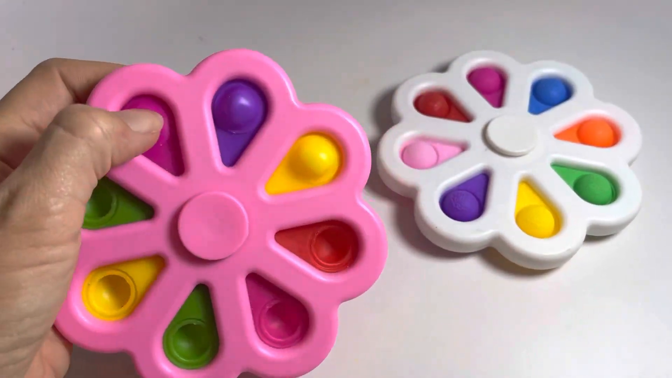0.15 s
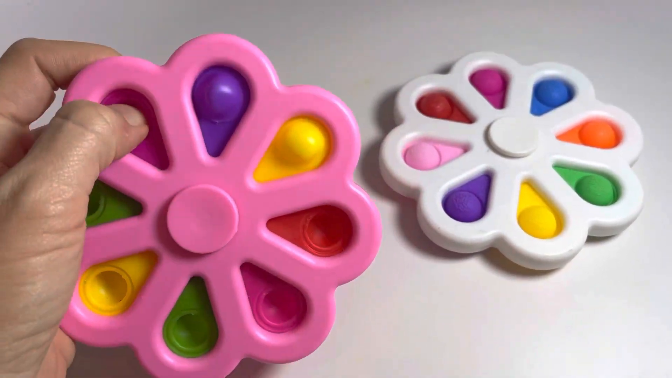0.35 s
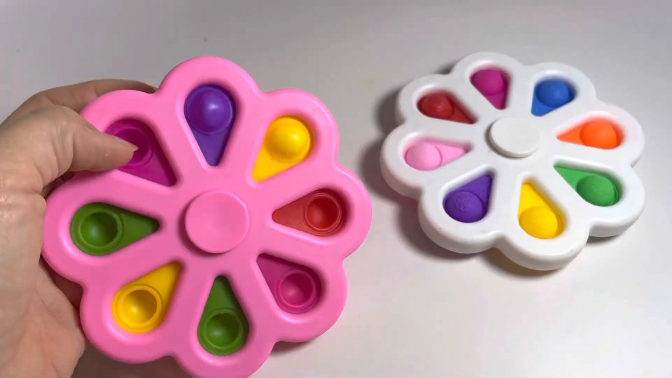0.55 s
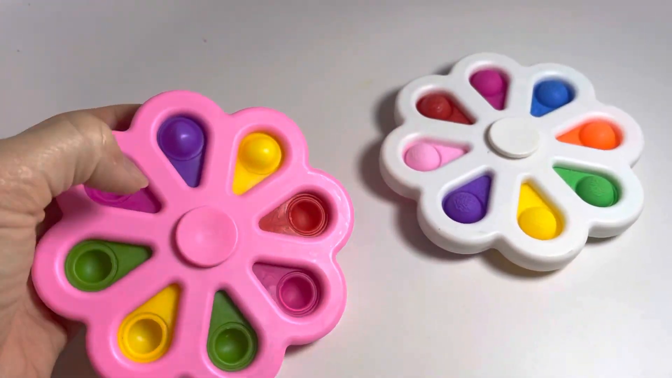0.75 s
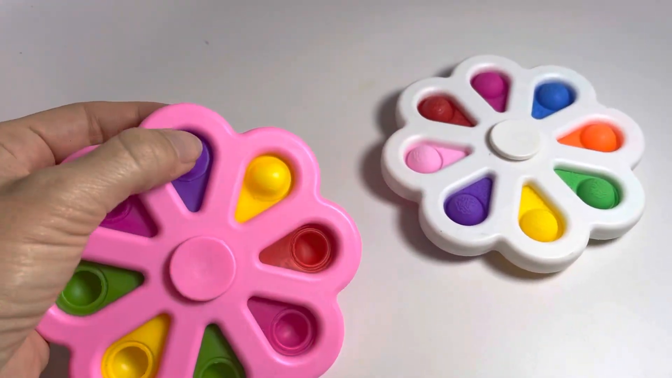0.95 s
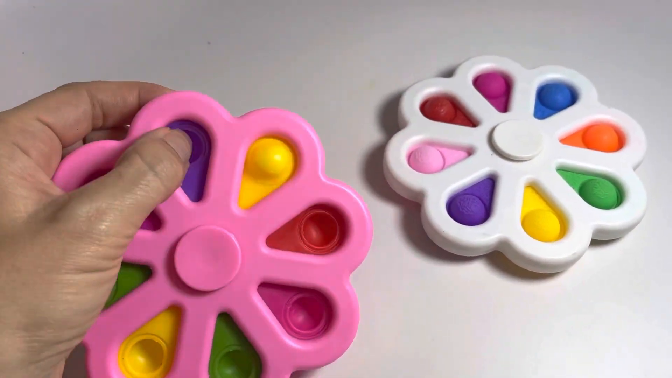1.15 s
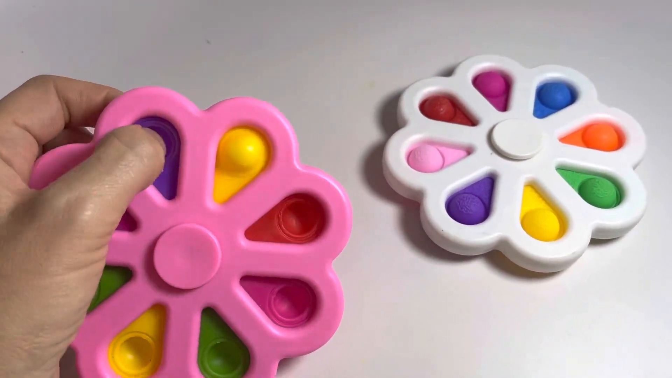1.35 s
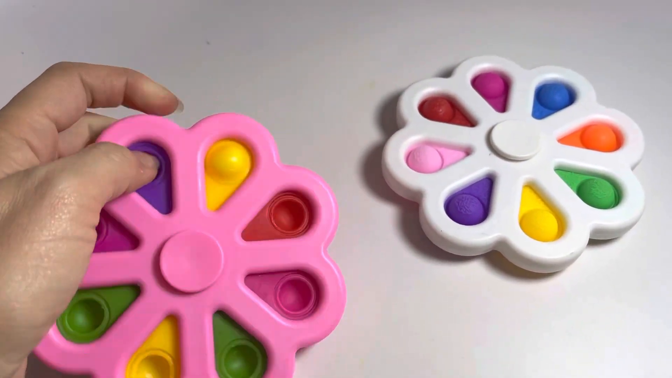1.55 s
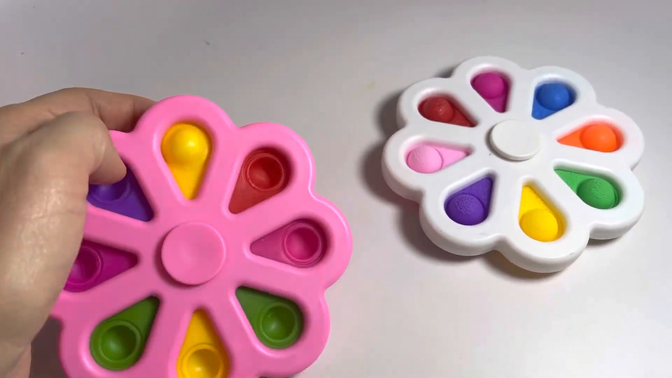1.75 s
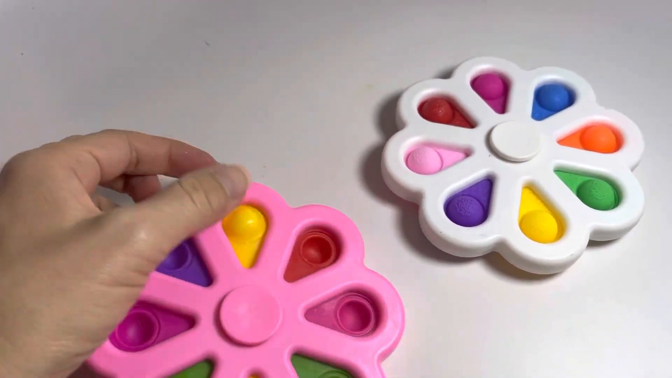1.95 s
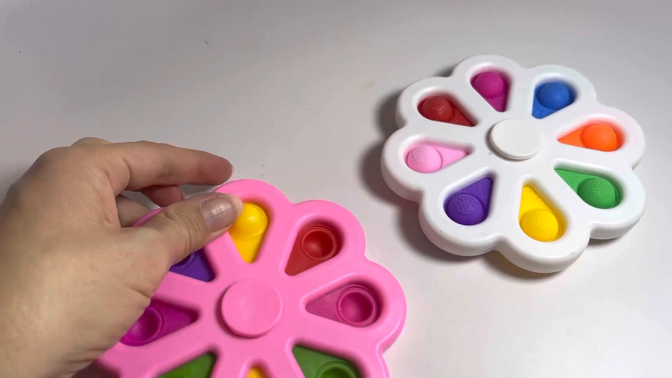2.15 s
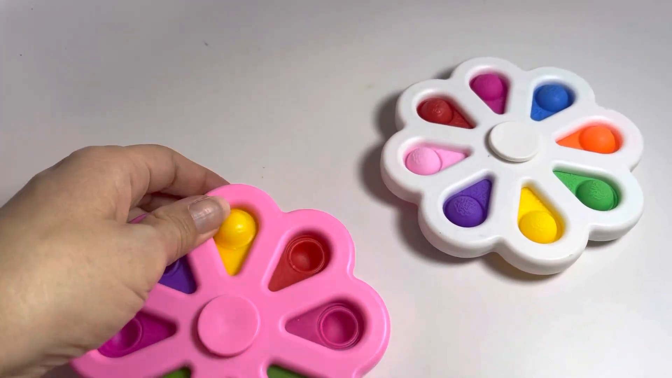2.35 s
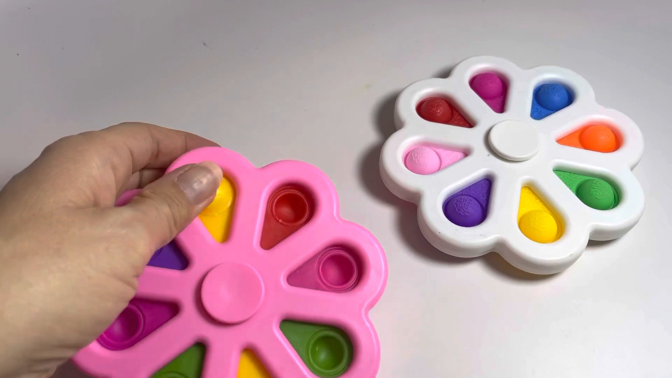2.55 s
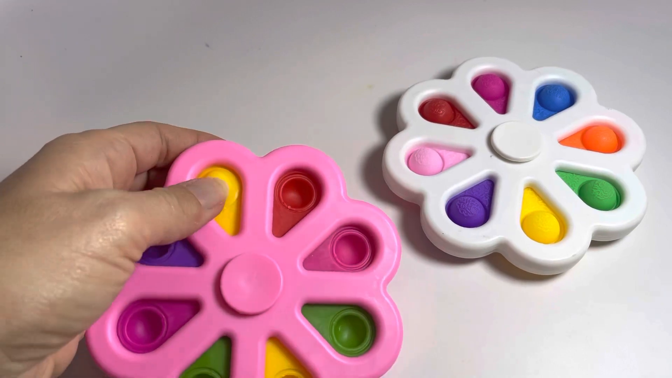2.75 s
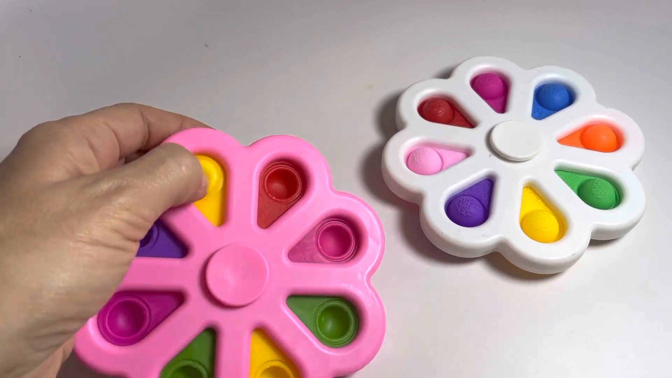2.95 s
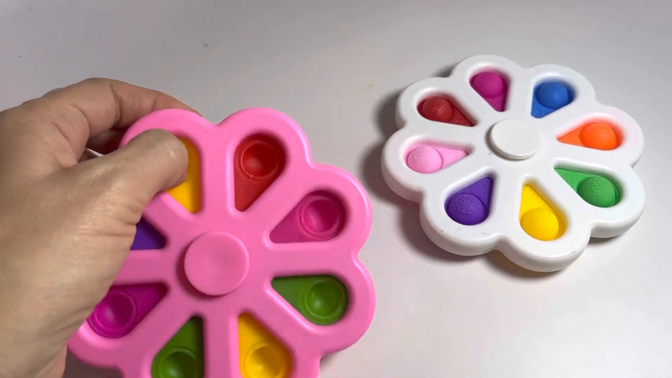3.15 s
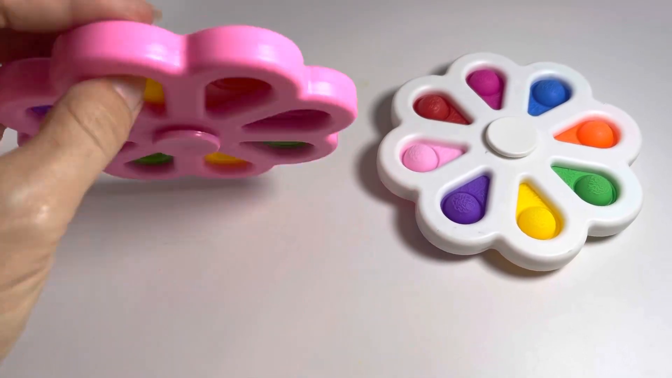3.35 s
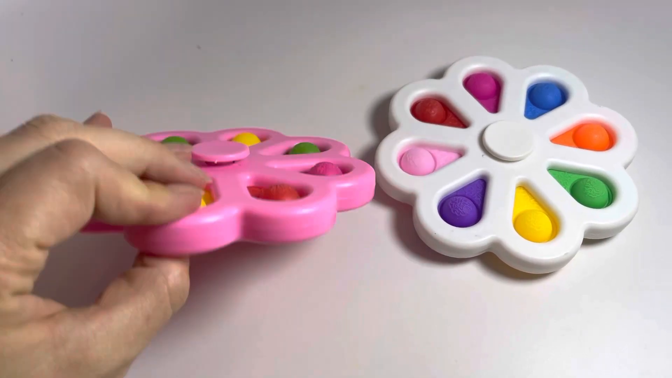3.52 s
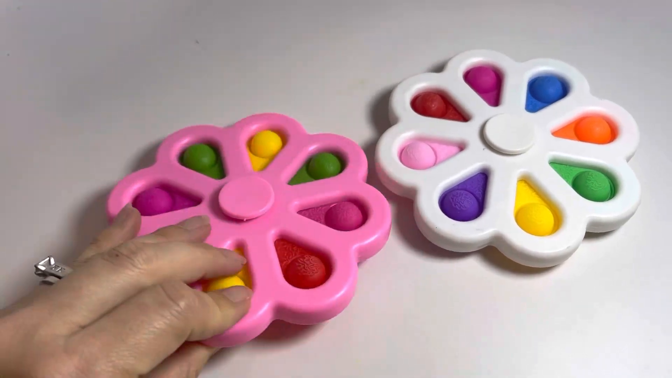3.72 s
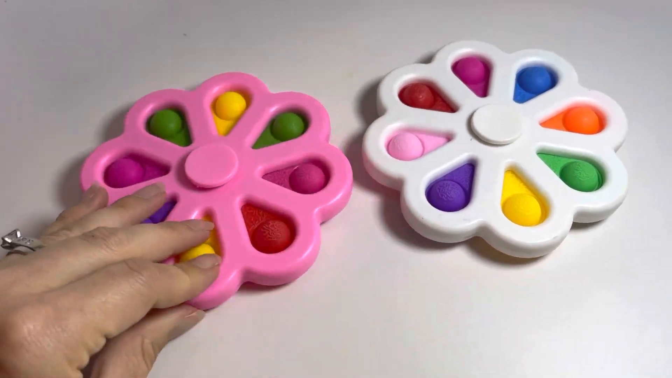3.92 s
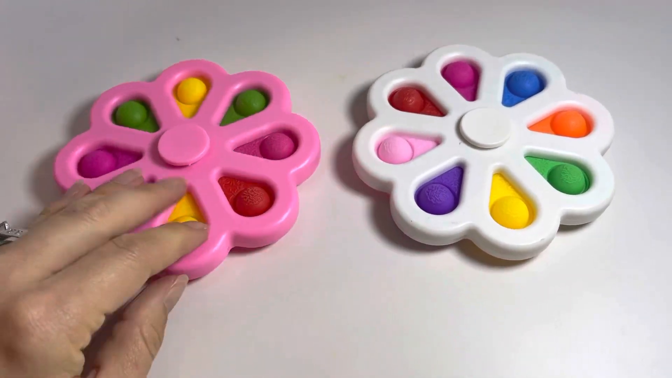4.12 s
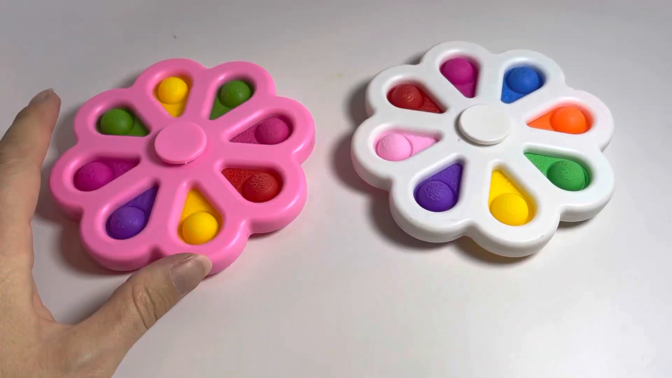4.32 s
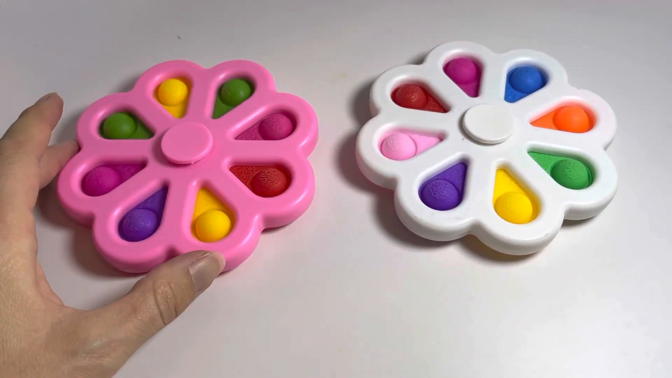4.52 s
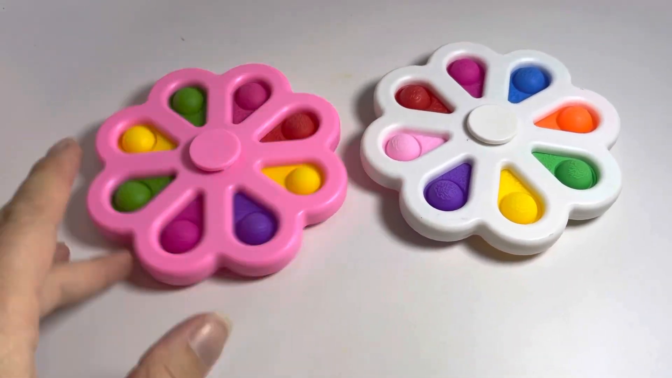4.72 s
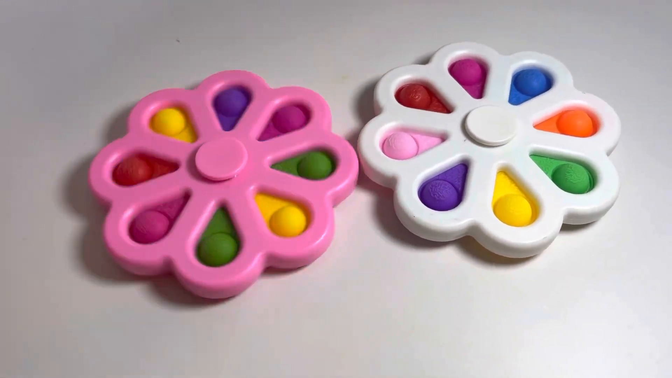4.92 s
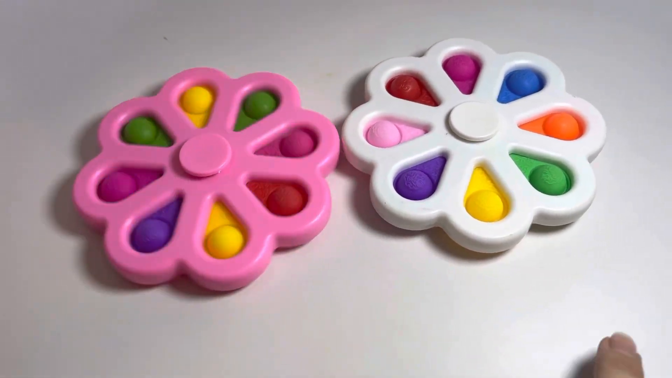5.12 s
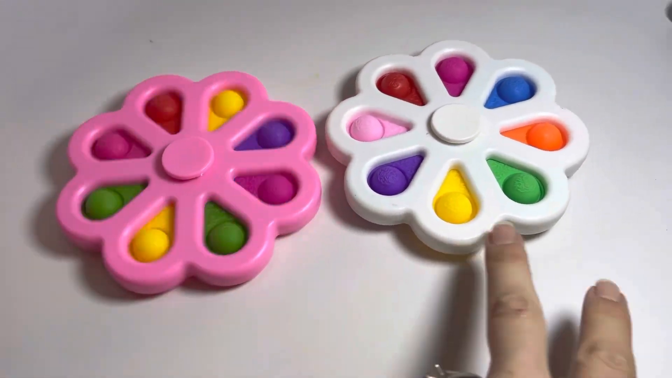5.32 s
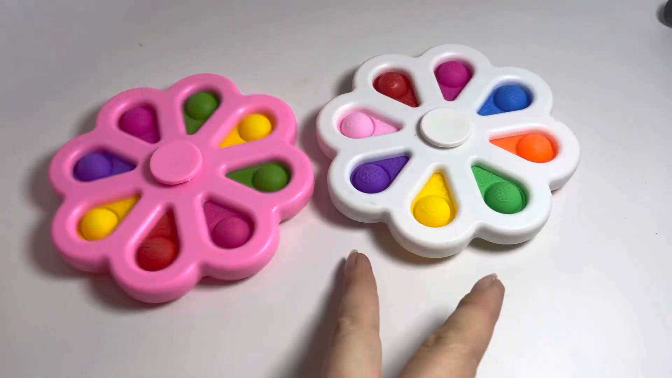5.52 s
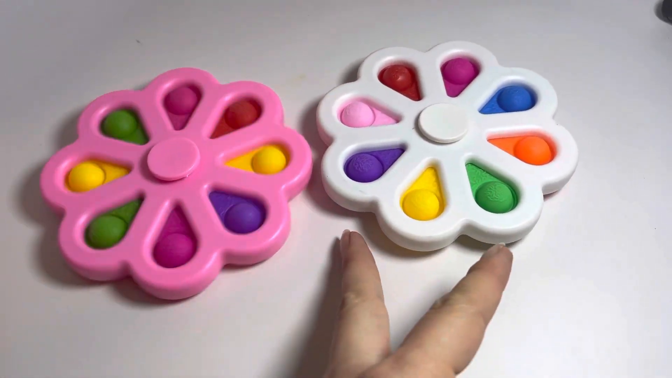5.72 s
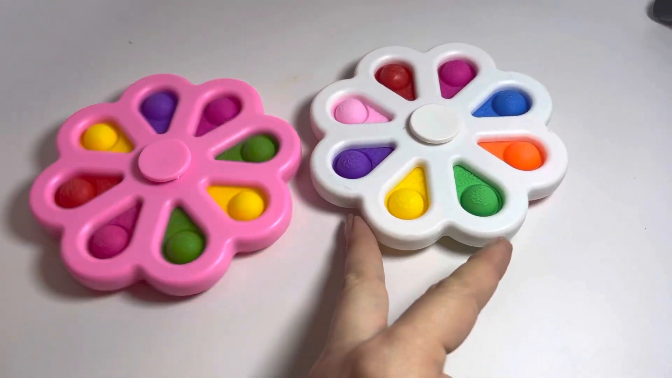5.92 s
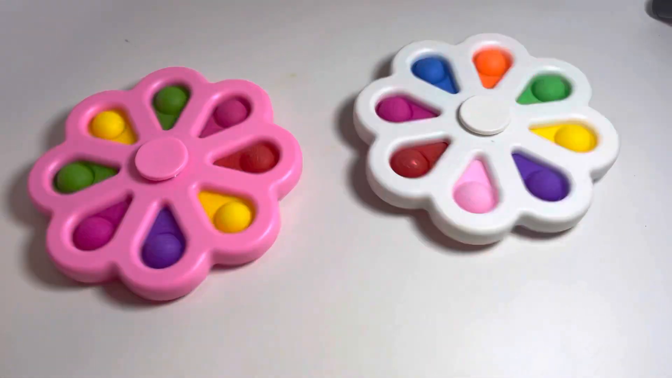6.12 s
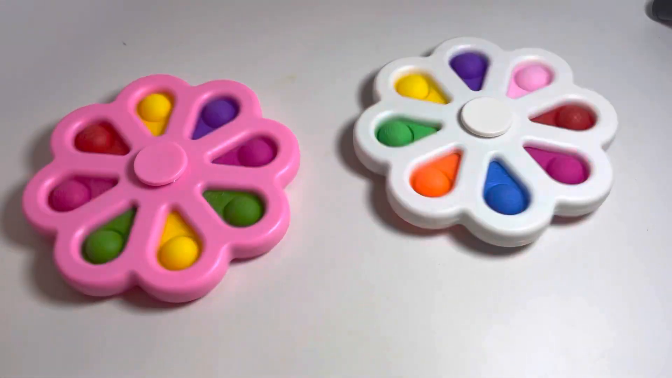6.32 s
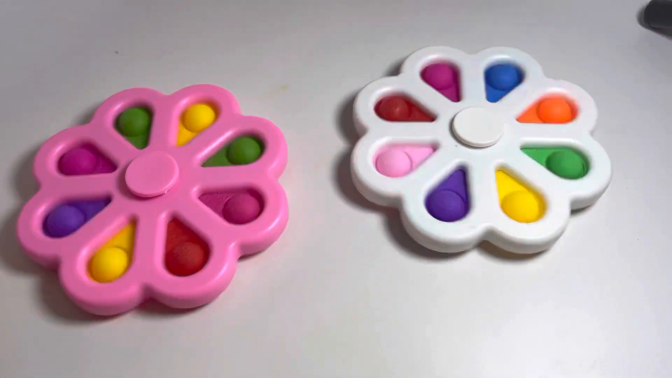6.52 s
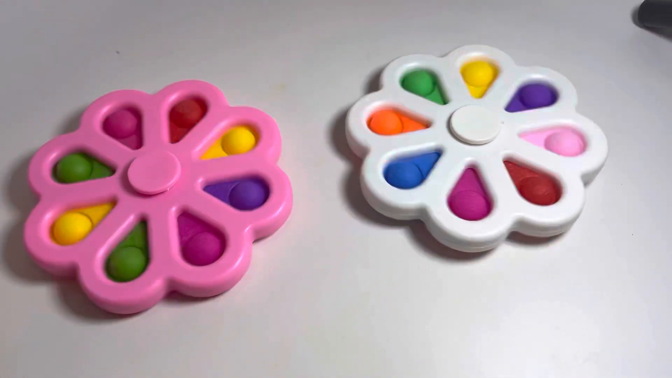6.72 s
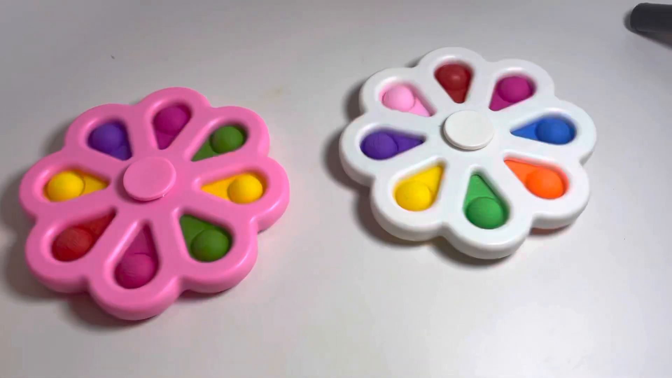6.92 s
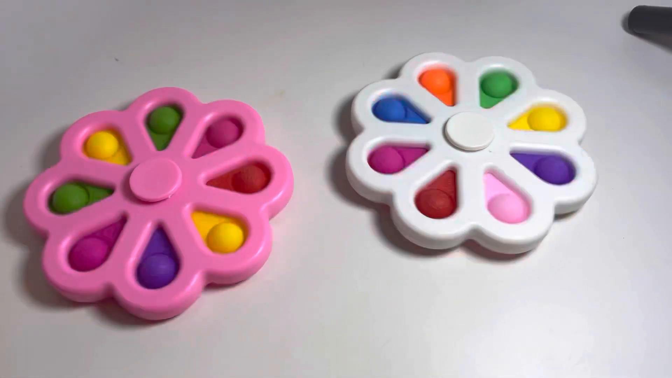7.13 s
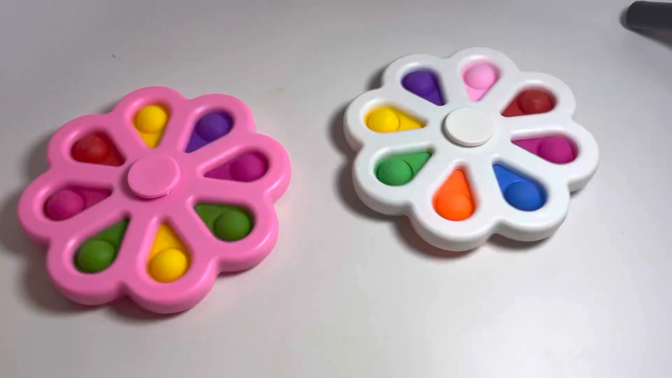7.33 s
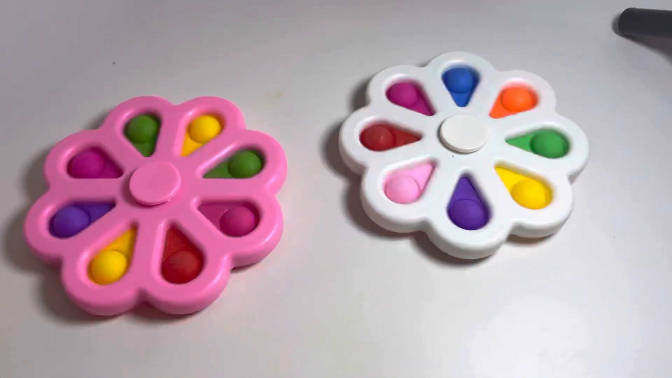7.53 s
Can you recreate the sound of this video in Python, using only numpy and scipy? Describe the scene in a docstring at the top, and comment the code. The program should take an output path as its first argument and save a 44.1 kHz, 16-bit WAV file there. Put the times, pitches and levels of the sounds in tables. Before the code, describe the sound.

Very close in a small room, a thumb pops silicone bubbles on a plastic toy: a sharp snap, then hollow knocks against a resonant tabletop. Clusters of thunks and soft skin rubs follow through the handling. The toy is set down and flicked, whirring; a second flick adds another spin with a low hum and tiny ticks over quiet room air.

```python
"""A small room: a plastic spinner toy with silicone bubbles, on a hollow table top close to two microphone ports.
A thumb pops bubbles, made as spiky noise bursts into resonances; knocks do the same and ring the board's modes.
Skin and a nail rub the plastic as grainy filtered noise, the frame rings and ticks, something bumps the table leg.
Two toys are flicked and spin: whirring noise from the bearings, and board modes humming under it.
Decaying noise gives the room's reflections, and a quiet bed of shaped noise its air."""
import sys
import numpy as np
from scipy import signal
from scipy.fft import rfft, irfft, next_fast_len
from scipy.io import wavfile
from scipy.ndimage import uniform_filter1d

SR = 44100
rng = np.random.default_rng(int(sys.argv[2]) if len(sys.argv) > 2 else 0)


def int16_out(signal):
    """Quantize to a 16-bit WAV file."""
    q = np.round(np.clip(np.atleast_2d(signal).T, -1, 1) * 32767)
    wavfile.write(sys.argv[1], SR, q.astype(np.int16))


N = 338114
SIZE = next_fast_len(N + SR)
HZ = np.arange(SIZE // 2 + 1) * SR / SIZE  # pitch of each frequency bin
BLOW = 4096  # samples computed for one blow or tick

# Frame touching the table. Each row: start in seconds, level in dB, treble in dB above that, rattle length in
# seconds, push into the table in dB, board pitch at the spot in Hz, sway of the legs in dB.
KNOCKS = [(0.206, -63, -5.5, 0.0037, -12, 283, -10), (0.503, -52, 10, 0.046, -2.5, 380, 1.5),
          (0.521, -8, -11, 0.0086, 0, 275, -4.5), (0.681, -2.5, -6, 0.007, -3, 258, -13),
          (0.712, -25, -20, 0.0044, 4, 324, -9.5), (0.768, -23, -19, 0.011, 4, 262, 3.5),
          (0.911, -43, 5, 0.006, 3, 131, -6), (1.127, -27.5, 1, 0.014, 3.5, 137, -6),
          (1.184, -9, -41, 0.0058, -2.5, 261, -12.5), (1.668, -17, -10, 0.0092, 4.5, 290, -23),
          (1.775, -17, -16.5, 0.01, -1.5, 137, -15), (1.842, -19.5, -35, 0.016, 5, 303, -8),
          (1.89, -24, -12, 0.011, 1, 310, -8), (1.951, -15.5, -11.5, 0.011, 1.5, 247, -12),
          (1.984, -24, -1, 0.017, -8, 374, -18), (2, -14, -5.5, 0.0032, -1, 222, -12.5),
          (2.036, -48.5, 23.5, 0.0038, 0, 253, -10), (2.054, -22, -25, 0.013, -4, 188, -14),
          (2.073, -28.5, -7, 0.0058, 9, 257, -8), (2.184, -21.5, -42, 0.0074, -3.5, 328, -5.5),
          (2.204, -23, -29, 0.0077, -3.5, 165.5, -15), (2.227, -57, 20, 0.0027, -5, 250, -5),
          (2.34, -53, 18.5, 0.0026, -20, 340, -5), (2.367, -30, -18, 0.0057, 2.5, 318, -6),
          (2.373, -31, -42, 0.035, 2.5, 334, 1), (2.909, -25.5, -18, 0.0021, -1.5, 174, -12),
          (3.011, -13, -5.5, 0.0035, -4.5, 288, -19), (3.027, -12.5, -2.5, 0.0029, -3, 278, 5),
          (3.43, -3, -11.5, 0.0097, -4, 249, 5), (3.449, -14.5, -31, 0.0074, 1.5, 170, -3),
          (3.559, -4, -9, 0.0057, -3.5, 177, -7), (3.678, -30.5, -6, 0.0086, 4, 142, 2.5),
          (3.777, -30.5, -18, 0.0066, 4.5, 178, -2), (3.852, -24, -27, 0.004, -5, 296, 11),
          (3.857, -15.5, -17, 0.0029, -8, 307, 4.5), (3.878, -42, -25, 0.0045, 10, 300, -7),
          (3.925, -36.5, -23, 0.0092, 1, 183, -0.5), (3.964, -24, -22, 0.0062, 3.5, 307, 1),
          (4.003, -26.5, -30.5, 0.003, -2.5, 307, -5), (4.025, -42, -30, 0.0044, 8, 321, -5.5),
          (4.102, -36, -6, 0.0084, 3, 117.2, 14), (4.362, -58.5, -8, 0.0033, 4, 201.7, -7.5),
          (4.812, -43, -20, 0.01, 7.5, 297, 6), (4.934, -45.5, -27, 0.0079, 9, 313, -3.5),
          (4.996, -46.5, -26, 0.0089, 8, 323, 4), (5.061, -36, -14, 0.026, 10.5, 270, -10.5),
          (6.07, -43, -6, 0.0035, -20, 310, -6), (6.092, -23.5, -29, 0.0075, 4.5, 346, -12),
          (6.213, -41, 0, 0.0082, -12, 246, 8.5)]
# Bubbles snapping through. Each row: start in seconds, level in dB, treble in dB above that, snap length in
# seconds, push into the table in dB, petal pitch in Hz.
POPS = [(0.2427, 2, 2, 0.0012, -53.5, 773), (0.245, -0.5, -12, .001, -49, 1004),
        (1.133, -5, 5, 0.002, -22.5, 776)]
# Finger flicks, slides over the frame, faint rustles of the hand, and the sizzle of the first pop (0.246 s).
# Each row: centre in seconds, half length in seconds, frame in dB, skin in dB, ring pitch in Hz, crunch in dB.
RUBS = [(0.246, 0.0028, -23, -23, 1390, -48), (0.696, 0.0095, -27, -34.5, 1310, -36.5),
        (0.865, 0.026, -43, -72, 1320, -69), (1.09, 0.019, -47, -67, 1300, -69),
        (1.425, 0.02, -50, -99, 1250, -89), (1.567, 0.023, -45, -56.5, 1300, -82),
        (1.653, 0.023, -39, -56, 1410, -51), (1.899, 0.016, -34, -69, 1310, -45.5),
        (2.287, 0.02, -44, -70, 1800, -56), (2.538, 0.059, -47.5, -71, 1324, -61.5),
        (3.018, 0.0053, -26.5, -32, 1250, -61), (3.169, 0.016, -41.5, -75, 1510, -60),
        (3.227, 0.023, -35, -48.5, 1700, -46.5), (3.319, 0.0064, -50.5, -52, 1500, -69),
        (3.467, 0.031, -47.5, -55, 1300, -53.5), (3.703, 0.0054, -44.5, -54, 1300, -49.5),
        (3.793, 0.015, -43.5, -80, 1600, -51), (3.828, 0.013, -41, -60, 1600, -49),
        (3.867, 0.0084, -67, -34.5, 1300, -84), (4.651, 0.02, -70, -72.5, 880, -76),
        (4.676, 0.0094, -47, -56, 1230, -60), (4.706, 0.013, -34.5, -41.5, 900, -55),
        (4.74, 0.0089, -38.5, -42.5, 1090, -50), (4.759, 0.012, -37.5, -54, 750, -62),
        (5.471, 0.011, -81, -69, 1300, -83), (5.579, 0.044, -73, -60, 1300, -78),
        (5.82, 0.02, -69, -73.5, 1300, -77.5), (5.965, 0.018, -43, -59.5, 1340, -52.5),
        (6.064, 0.012, -46, -46.5, 1990, -48), (6.097, 0.017, -31, -42, 1050, -46),
        (6.149, 0.0038, -41, -49, 1290, -51), (6.205, 0.038, -62, -71, 1310, -67),
        (6.604, 0.024, -82, -74, 1290, -89), (6.696, 0.022, -75.5, -65.5, 1925, -78)]


def undb(db):
    """Gain of a level in dB."""
    return 10 ** (np.asarray(db) / 20)


def unit(x):
    """Sound scaled to rms 1."""
    return x / np.sqrt(np.mean(x ** 2))


def along(curve):
    """A (Hz, value) curve on every frequency bin, straight lines over log pitch."""
    hz, value = np.transpose(curve)
    return np.interp(np.log(HZ + 1), np.log(hz + 1), value)


def band_share(log_centres, k):
    """Weight of band k over log pitch: it fades to nothing at its neighbours, the outer bands run on."""
    return np.interp(np.log(HZ + 1), log_centres, np.arange(len(log_centres)) == k)


def shape(x, gain):
    """Sound through a frequency response."""
    return irfft(rfft(x, SIZE) * gain, SIZE)[..., :N]


def causal(db):
    """Minimum-phase response of that loudness, which only rings after its cause."""
    cepstrum = irfft(db * np.log(10) / 20, SIZE)
    cepstrum[1:SIZE // 2] *= 2
    cepstrum[SIZE // 2 + 1:] = 0
    return np.exp(rfft(cepstrum))


def body(peaks):
    """Summed resonances, neighbours in opposite phase; plastic damps each to a width of 70 Hz or more."""
    narrowest_hz = 70
    f = np.maximum(HZ, 1)
    response = 0
    for k, (hz, width, db) in enumerate(peaks):
        detune = (f - hz ** 2 / f) / max(width, narrowest_hz)
        response = response + (-1) ** k * undb(db) / (1 + 1j * detune)
    return response


def ring(x, hz, t60):
    """One decaying mode; a unit blow starts its envelope at height 1."""
    r, w = np.exp(-np.log(1000) / (t60 * SR)), 2 * np.pi * hz / SR
    return signal.lfilter([0, r * np.sin(w)], [1, -2 * r * np.cos(w), r * r], x)


def flicker(rate, db):
    """Gain that wanders by db (rms) about rate times a second."""
    k = int(SR / rate)
    wander = uniform_filter1d(uniform_filter1d(rng.standard_normal(N), k), k)
    return undb(db * unit(wander))


def contact():
    """Gains of board drag, frame whirr and skin slip: the hand, the shiver after knocks, rubs and spins."""
    # The toy in the hand. Each row: time in seconds, drag through the board in dB, whirr of the frame in dB,
    # skin rubbing in dB.
    hand = [(0, -80, -88.5, -67), (0.171, -69, -78.5, -74.5), (.3, -86, -56, -67), (0.449, -73, -55.5, -58),
            (.9, -61, -56, -74), (1.04, -63, -73.5, -95), (1.26, -50, -55.5, -66), (1.5, -51.5, -71, -65),
            (1.62, -43.5, -49.5, -70), (1.95, -42, -43, -56), (2.15, -69, -104, -79), (2.42, -47, -58, -75),
            (2.62, -51.5, -55.5, -76), (2.803, -61, -75, -86), (2.95, -59.5, -58, -73),
            (3.1, -58, -60.5, -66.5), (3.38, -77, -64, -70), (3.651, -57, -58, -68), (4.0, -42, -57, -54),
            (4.14, -47.5, -81, -94.5), (4.4, -70, -87.5, -95.5), (4.649, -70, -94, -86.5)]
    # Toys set spinning. Each row: start in seconds, hum in the board in dB, whirr in dB, extra while it wobbles
    # in dB, time for the wobble to settle in seconds.
    spins = [(4.749, -68.5, -64, 30.5, 0.045), (6.1, -52, -63, 16.5, 0.13)]
    shiver_board_db, shiver_frame_db, shiver_s = -23, -32, 0.058  # the frame chatters on after a knock
    spin_up_s, slowing_db_per_s, spin_hiss_db = 0.021, 1, -61
    rub_board_db = -8.5  # share of a rub that the board takes

    t = np.arange(N) / SR
    times, *columns = np.transpose(hand)
    drag, whirr, slip = (undb(np.interp(t, times, column)) for column in columns)

    kicks = np.zeros((2, N))
    for s, db, _, _, push, *_ in KNOCKS:
        kicks[:, int(s * SR)] = undb(db + push + shiver_board_db), undb(db + shiver_frame_db)
    shiver = signal.lfilter([1], [1, -np.exp(-1 / (shiver_s * SR))], kicks)

    rub = 0
    for s, half, frame_db, slip_db, *_ in RUBS:
        swell = np.exp(-.5 * ((t - s) / half) ** 2)
        rub = rub + undb(frame_db) * swell
        slip = slip + undb(slip_db) * swell

    for s, hum_db, whirr_db, wobble_db, settle in spins:
        age = np.maximum(t - s, 0)
        level_db = wobble_db * np.exp(-age / settle) - slowing_db_per_s * age
        spin = np.minimum(age / spin_up_s, 1) * undb(level_db)
        drag = drag + undb(hum_db) * spin
        whirr = whirr + undb(whirr_db) * spin
        slip = slip + undb(whirr_db + spin_hiss_db) * spin
    return drag + shiver[0] + undb(rub_board_db) * rub, whirr + shiver[1], slip


def bearing_whirr():
    """Bearing and sliding feet shake the frame with noise and stray ticks, each band drifting alone."""
    # Colour of the whirr. Each row: pitch in Hz, level in dB.
    whirr_colour = [(260, -33), (450, -3), (564, -1), (698, -7), (791, 0), (885, 0), (967, -3.5),
                    (1270, -4.5), (1390, -7), (1900, -5), (2000, -7.5), (2770, -17), (3700, -18),
                    (4810, -34), (9000, -52), (11700, -65.5), (19800, -120)]
    # Centres of the drifting bands, in Hz.
    band_centres = [400, 800, 1300, 1900, 3200]
    # Modes of the bearing. Each row: pitch in Hz, level in dB, t60 in seconds.
    bearing_modes = [(854, -3, 0.044), (1250, 0.5, 0.07), (1600, -4, 0.045), (1925, -1, 0.04),
                     (2220, -7, 0.022), (2366, -9.5, 0.025), (3250, -8.5, 0.024), (4000, -12.5, 0.015)]
    ticks_per_s, tick_db, bearing_hum_db = 40, 14, -10

    ticks = undb(tick_db) * (rng.random(N) < ticks_per_s / SR) * rng.standard_normal(N)
    shake = rng.standard_normal(N) + ticks
    broad = unit(shape(shake, causal(along(whirr_colour))))
    log_centres = np.log(band_centres)
    whirr, hum = 0, 0
    for k in range(len(log_centres)):
        whirr = whirr + flicker(24, 1.9) * shape(broad, band_share(log_centres, k))
    for hz, db, t60 in bearing_modes:
        hum = hum + undb(db) * flicker(7, 2.5) * ring(shake, hz, t60)
    return (whirr + undb(bearing_hum_db) * unit(hum)) * flicker(40, 0.74)


def friction(whirr_gain, slip):
    """Skin slips over plastic in fine grains, which also drive the rubs; the bearing whirr joins them."""
    # Colours of rubbed skin, of a slide and of a nail edge on the plastic. Each row: pitch in Hz, level in dB.
    skin_colour = [(2500, -9.5), (4000, -4), (6000, -7), (7400, -10.5), (8350, -1.5), (9000, -2.5),
                   (10200, -3), (11700, 0.5), (13000, -19.5), (15000, -10.5)]
    slide_colour = [(240, -3), (400, 9.5), (474, 4.5), (845, 5), (968, 5), (1830, -8.5), (2260, -1),
                    (2620, -11), (6000, -65), (7800, -111), (13200, -120)]
    crunch_colour = [(1200, -28.5), (2000, -1.5), (2800, 2), (3400, -1), (4000, -3), (4500, -8.5),
                     (6000, -10.5), (8000, -37)]
    # Resonances that ring under a sliding finger and under the nail. Each row: pitch in Hz, width in Hz
    # (widened by the damping where narrow), level in dB.
    finger_rings = [(773, 91, 3), (1250, 150, 6.5), (1807, 200, 12.5), (2300, 420, -12), (3940, 340, 22)]
    nail_rings = [(1500, 250, 0), (2800, 330, 4), (4000, 53, 9)]
    grain_step_db, biggest_grain = 2.0, 4  # the biggest grain is counted in steps
    catches_per_s, catch_db = 250, 15  # catches of the nail

    whirr = bearing_whirr()
    grain_db = grain_step_db * np.minimum(rng.exponential(size=N), biggest_grain)
    grains = rng.standard_normal(N) * undb(grain_db) * flicker(170, 1.8) * flicker(60, 0.96)
    skin = unit(shape(grains, undb(along(skin_colour))))
    finger = unit(shape(grains, undb(along(slide_colour)) * (1 + np.abs(body(finger_rings)))))
    catches = grains * (1 + undb(catch_db) * (rng.random(N) < catches_per_s / SR))
    crunch = unit(shape(catches, undb(along(crunch_colour)) * (1 + np.abs(body(nail_rings)))))
    return whirr_gain * whirr + slip * skin + rubs(finger, crunch)


def room(x):
    """Dense decaying reflections, band by band, partly alike left and right."""
    # Reflections. Each row: band centre in Hz, t60 in seconds, level in dB.
    echoes = [(310, 0.2, 3), (680, 0.18, -3.5), (1090, 0.31, -5.5), (1700, 0.27, -6), (3163, 0.32, -4.5),
              (6800, 0.43, -7), (11860, 0.15, -8.5)]
    # How alike left and right are. Each row: pitch in Hz, correlation from 0 to 1.
    likeness = [(100, 0.81), (300, 0.71), (800, 0.83), (2000, .3), (5000, 0.13), (12000, 0.95)]
    build_up_s = 0.0059

    t = np.arange(SR // 2) / SR
    log_centres = np.log([row[0] for row in echoes])
    mid, side = 0, 0
    for k, (_, t60, db) in enumerate(echoes):
        tail = undb(db - 60 * t / t60) * np.minimum(t / build_up_s, 1)
        tail = tail / np.sqrt(t60 * SR / 14)  # longer tails carry no more energy
        a, b = rfft(rng.standard_normal((2, len(t))) * tail, SIZE) * band_share(log_centres, k)
        mid, side = mid + a, side + b
    alike = along(likeness)
    mid = mid * np.sqrt((1 + alike) / 2)
    side = side * np.sqrt((1 - alike) / 2)
    return shape(x, np.array([mid + side, mid - side]))


def bursts(rows, petals_hz, peaks, crack, rise, crack_share):
    """Each blow is a spiky rattle into the body with a crack on top; the struck petal rings at its own pitch."""
    evenness = 0.87  # 0 = chance colour, 1 = a rattle drives all pitches alike
    petal_db, petal_t60_s = -21, .014
    low, high, petal = np.zeros((3, N + BLOW))
    t = np.arange(BLOW) / SR
    grit = rng.standard_normal((len(rows), BLOW)) * rng.standard_normal((len(rows), BLOW))

    def rattle(noise, gain, tau):
        """Fading noise with its spectrum flattened, at the energy of its fade."""
        fade = np.minimum(t / rise, 1) ** 2 * np.exp(-t / tau)
        tones = rfft(noise * fade)
        spiky = irfft(tones / (np.abs(tones) + 1e-9) ** evenness) * np.sqrt(fade)
        return gain * spiky * np.linalg.norm(fade) / np.linalg.norm(spiky)

    for (s, db, treble_db, length, *_), hz, noise in zip(rows, petals_hz, grit):
        span = slice(int(s * SR), int(s * SR) + BLOW)
        thump = rattle(noise, undb(db), length)
        low[span] += thump
        high[span] += rattle(noise[::-1], undb(db + treble_db), crack_share * length)
        petal[span] += ring(thump, hz, petal_t60_s)
    return shape(low[:N], body(peaks)) + shape(high[:N], causal(along(crack))) + undb(petal_db) * petal[:N]


def knocks():
    """The frame rattles its hollow resonances and cracks as it meets the table."""
    # Hollow frame resonances. Each row: pitch in Hz, width in Hz (widened by the damping where narrow), level in dB.
    frame = [(546, 370, -7.5), (815, 279, 11.5), (825, 33, 5), (1050, 300, 1.5), (1306, 200, 6),
             (1640, 39, 0), (1796, 30, 9.5), (2380, 250, -4), (2547, 533, -7), (3810, 120, -7.5)]
    # Colour of the crack. Each row: pitch in Hz, level in dB.
    crack = [(1500, 0), (2500, 2.5), (3500, -9), (4800, -6), (6500, -10.5), (9000, -10.5), (12000, -3.5),
             (16000, -37)]
    petal_hz, petal_spread = 1325, 0.11  # a knock rings a petal near this pitch
    petals_hz = petal_hz * (1 + petal_spread * rng.standard_normal(len(KNOCKS)))
    return bursts(KNOCKS, petals_hz, frame, crack, rise=0.00045, crack_share=1.0)


def table_top(drag):
    """Blows spread slowly through the board and favour the modes of their spot; dragging keeps it humming."""
    # Table top modes. Each row: pitch in Hz, level under a blow in dB, t60 in seconds, level under dragging in dB.
    modes = [(60.2, -13, 0.68, -26), (77.6, -18, 0.32, -16), (108.4, -9, 0.59, -15.5), (137, -0.5, 0.2, -4),
             (180, -5, 0.43, -9.5), (188, -13, 0.13, -6.5), (221, -7.5, 0.17, -9), (258, -8.5, 0.29, -7),
             (307, -8.5, 0.37, -7), (342.7, -2, 0.14, -6), (382.8, -10, 0.11, 0.5), (392, -6.5, 0.099, -10),
             (509.3, -12.5, 0.05, -15.5), (571, -12, .1, -16)]
    rise_s, spot_octaves, spot_scatter_db = 0.0041, 0.85, 3
    legs_hz = 90  # modes below this sway on the legs
    waver_per_s, waver_db = 45, 3  # the toy rocking on the board chokes and frees each mode above the legs

    rows = [(s, db + push, 250, 0) for s, db, _, _, push, _ in POPS]
    rows += [(s, db + push, hz, sway) for s, db, _, _, push, hz, sway in KNOCKS]
    t = np.arange(BLOW) / SR
    swell = t / rise_s * np.exp(-t / rise_s) / (rise_s * SR)
    scatter = rng.standard_normal((len(rows), len(modes)))
    phase = rng.random((len(rows), len(modes)))
    blows, hum = 0, 0
    for m, (hz, blow_db, t60, hum_db) in enumerate(modes):
        force = np.zeros(N + BLOW)
        for (s, db, spot_hz, sway_db), chance, start in zip(rows, scatter, phase):
            octaves = np.log2(hz / spot_hz)
            near_db = max(-6 * (octaves / spot_octaves) ** 2, -12) + spot_scatter_db * chance[m]
            if hz < legs_hz:
                near_db = sway_db
            push = swell * np.cos(2 * np.pi * (hz * t + start[m]))
            force[int(s * SR):int(s * SR) + BLOW] += undb(db + near_db) * push
        waver = flicker(waver_per_s, waver_db * (hz > legs_hz))
        blows = blows + undb(blow_db) * waver * ring(force[:N], hz, t60)
        hum = hum + undb(hum_db) * ring(rng.standard_normal(N), hz, t60)
    return blows + drag * flicker(25, 0.63) * unit(hum)


def thuds():
    """The board flexes for a moment under a knock, sagging in pitch, a slower flex beneath."""
    late_s, length_s, thud_db = 0.0029, .026, -3
    sag = 0.24  # pitch starts this share above the spot's own and ends as far below
    under_pitch, under_db = 0.52, -5.5  # slower flex, as a ratio of pitch and a level against the upper one
    out = np.zeros(N + 8192)
    t = np.arange(int(length_s * SR)) / SR
    share = t / t[-1]
    for (s, db, _, _, push, hz, _), start in zip(KNOCKS, rng.random((len(KNOCKS), 2))):
        turns = hz * t * (1 + sag * (1 - share))
        upper = np.sin(np.pi * share ** 0.72) ** 2 * np.cos(2 * np.pi * (turns + start[0]))
        under = np.sin(np.pi * share) ** 2 * np.cos(2 * np.pi * (under_pitch * turns + start[1]))
        at = int((s + late_s) * SR)
        out[at:at + len(t)] += undb(db + push + thud_db) * (upper + undb(under_db) * under)
    return out[:N]


def pops():
    """Each bubble snaps through and rings the air under it; open on both sides, it sheds its bass."""
    # Air under the bubble. Each row: pitch in Hz, width in Hz, level in dB.
    bubble = [(750, 180, 7.5), (1130, 650, 8), (1500, 270, 7), (2380, 710, 1), (3458, 340, -8)]
    # Colour of the snap, then the loss from the open back. Each row: pitch in Hz, level in dB.
    snap = [(1500, -13.5), (2500, -4.5), (3800, -0.5), (4600, 4.5), (5800, -1), (7000, -18), (9000, -25.5),
            (12000, -34), (16000, -37)]
    open_back = [(60, -24.5), (250, -14.5), (600, 2)]
    petals_hz = [row[-1] for row in POPS]
    snaps = bursts(POPS, petals_hz, bubble, snap, rise=0.001, crack_share=0.62)
    return shape(snaps, causal(along(open_back)))


def rubs(finger, crunch):
    """Each flick, slide, rustle or sizzle swells, rings near its own pitch and adds a crunch."""
    ring_db, ring_q = 7.5, 2.2
    out, t = np.zeros(N), np.arange(N) / SR
    for s, half, frame_db, _, hz, crunch_db in RUBS:
        span = slice(int((s - 4 * half) * SR), int((s + 4 * half) * SR))
        rung = signal.lfilter(*signal.iirpeak(hz, ring_q, fs=SR), finger[span])
        rub = undb(frame_db) * (finger[span] + undb(ring_db) * rung) / 2
        swell = np.exp(-.5 * ((t[span] - s) / half) ** 2)
        out[span] += swell * (rub + undb(crunch_db) * crunch[span])
    return out


def frame_rings_and_ticks():
    """Each frame ring after a knock, or hard tick, is a tiny broad rattle with a short ring at its own pitch."""
    # Short rings of the frame after knocks, and hard ticks of the toy. Each row: start in seconds, level in dB,
    # pitch in Hz, ring t60 in seconds.
    short_rings = [(.523, -19.5, 1200, 0.072), (.684, -18.5, 1230, .07), (1.186, -22.5, 1300, 0.054),
                   (1.847, -25.5, 1310, 0.099), (1.893, -29, 2600, .03), (1.954, -23, 2800, .02),
                   (2.186, -25, 2400, .02), (3.013, -21, 850, .03), (3.028, -21, 1320, .04),
                   (3.431, -16, 1600, 0.046), (3.561, -21, 1550, .04), (3.857, -23, 863, 0.031),
                   (3.966, -27, 795, 0.091), (4.005, -35, 852, .05), (4.107, -41, 1096, .06),
                   (4.936, -49, 4500, 0.015), (4.998, -36, 690, .04), (5.058, -30, 1250, 0.021),
                   (6.266, -44.5, 4000, 0.015), (6.351, -52, 3250, 0.0088), (6.948, -50, 1500, 0.007),
                   (7.047, -59, 5600, 0.0065), (7.134, -41, 1700, 0.0091), (7.186, -56, 4100, 0.0079),
                   (7.325, -46, 3250, .006), (7.37, -51, 3250, 0.0045), (7.414, -56, 4100, 0.0056),
                   (7.457, -55.5, 4100, 0.0067), (7.504, -39.5, 3140, 0.0055)]
    rattle_s, broad_db = 0.0021, -4
    edge = 4  # the first touch against the rattle behind it
    soften_s = 0.00006  # rounds off the treble
    out = np.zeros(N + BLOW)
    grit = rng.standard_normal((len(short_rings), BLOW)) * np.exp(-np.arange(BLOW) / (rattle_s * SR))
    grit[:, 0] = edge
    for (s, db, hz, t60), rattle in zip(short_rings, grit):
        rattle = rattle / np.linalg.norm(rattle)
        broad = np.diff(rattle, prepend=0)
        out[int(s * SR):int(s * SR) + BLOW] += undb(db) * (ring(rattle, hz, t60) + undb(broad_db) * broad)
    return shape(out[:N], np.exp(-(HZ * soften_s) ** 2))


def bumps():
    """A soft bump against the table leg: a dull thump that sags in pitch and dies."""
    # Each row: start in seconds, level in dB, pitch it settles to in Hz, t60 in seconds.
    leg_bumps = [(7.276, -30, 57.7, 0.62)]
    rise_s, sag_turns, sag_s = .006, 0.65, 0.018
    out, t = np.zeros(N), np.arange(N) / SR
    for s, db, hz, t60 in leg_bumps:
        age = np.maximum(t - s, 0)
        turns = hz * age + sag_turns * (1 - np.exp(-age / sag_s))
        out += undb(db - 60 * age / t60) * (1 - np.exp(-age / rise_s)) * np.sin(2 * np.pi * turns)
    return out


def toy(whirr_gain, slip):
    """All that the toy itself radiates."""
    return pops() + knocks() + frame_rings_and_ticks() + friction(whirr_gain, slip)


def quiet_air():
    """Steady noise of the quiet room, mostly bass."""
    # Colour of the air. Each row: pitch in Hz, level in dB.
    air_colour = [(18, -23), (30, 0.5), (241, -9.5), (1020, -24), (1280, -28), (1530, -39), (14000, -41.5)]
    air_db = -71.5  # ahead of the microphone's colour
    return undb(air_db) * unit(shape(rng.standard_normal(N), undb(along(air_colour))))


def scene():
    """Toy and table close by, the room's reflections and the quiet air, left and right."""
    # Sound of the toy heard opposite left and right. Each row: pitch in Hz, level in dB.
    faces_colour = [(150, -29), (400, -0.5), (900, -6), (2000, -5), (4000, -6), (8000, -11), (13000, -25.5)]
    drag, whirr_gain, slip = contact()
    front = toy(whirr_gain, slip)
    # other faces of the frame rattle in the same moments but in their own detail
    faces = shape(toy(whirr_gain, slip), causal(along(faces_colour)))
    board = table_top(drag) + thuds() + bumps()
    wide = faces + undb(-33.5) * np.roll(board, 90)  # a little of the board, 90 samples late
    return front + board + quiet_air() + np.array([wide, -wide]) + room(front)


def record(dry):
    """Two ports that differ in level and phase, the microphone's colour, rounded peaks and the cut at the top."""
    # Level between the ports. Each row: pitch in Hz, left minus right in dB.
    port_db = [(30, 1.1), (80, 1.9), (180, 2), (350, 2.8), (700, 4), (1400, 3.7), (2800, 2.6), (5600, 1.6),
               (10000, .2)]
    # Phase between the ports. Each row: pitch in Hz, lead of the left in radians.
    port_lead = [(0, 0), (800, .3), (3300, .6), (8000, .6), (8650, 0), (10250, -3.14), (12000, -6.3),
                 (16400, -12.8)]
    # Colour of the microphone. Each row: pitch in Hz, level in dB.
    mic = [(30, -18.5), (55, -7.5), (8500, 1.5), (10200, 2), (12000, -0.5), (13000, -21.5), (15000, -17.5),
           (16000, -15.5)]
    headroom, top_hz = 1.1, 16300
    half = undb(along(port_db) / 2) * np.exp(.5j * along(port_lead))  # each port takes half the difference
    heard = shape(dry, np.array([half, 1 / half]) * causal(along(mic)))
    rounded = headroom * np.tanh(heard / headroom)
    return signal.sosfilt(signal.ellip(8, .2, 70, top_hz, fs=SR, output="sos"), rounded)


dry = scene()
out = record(dry)
int16_out(out)
```